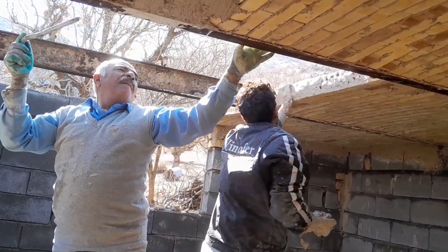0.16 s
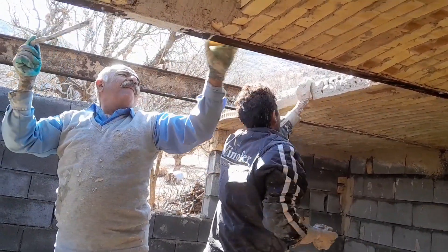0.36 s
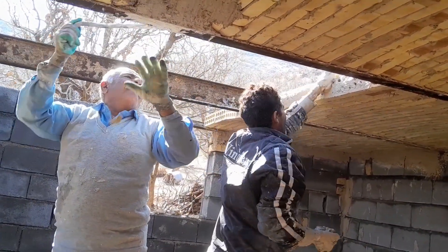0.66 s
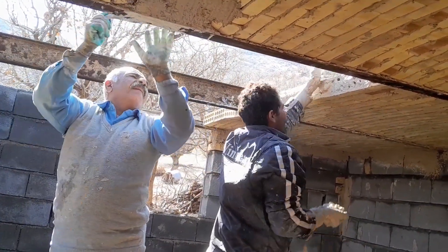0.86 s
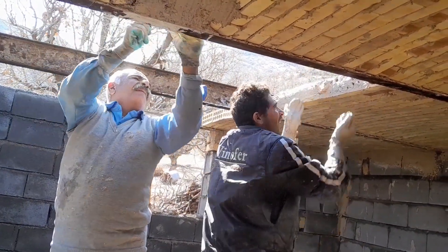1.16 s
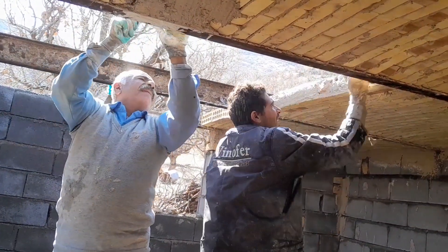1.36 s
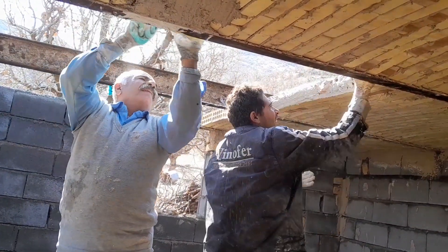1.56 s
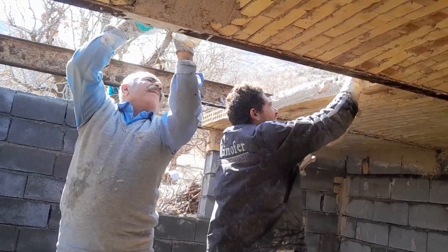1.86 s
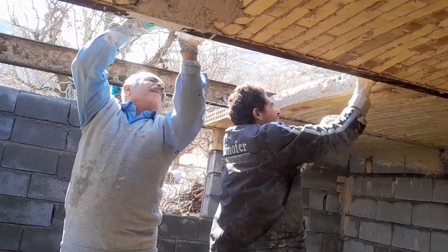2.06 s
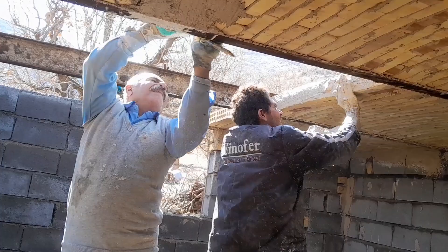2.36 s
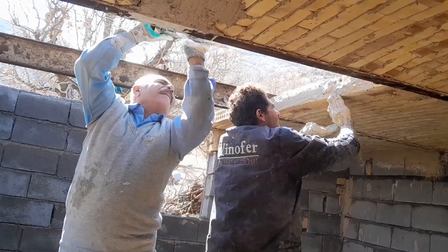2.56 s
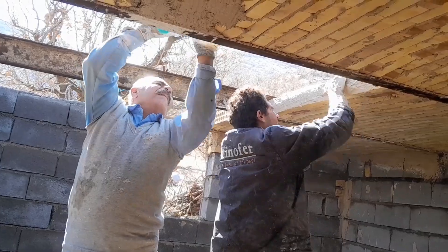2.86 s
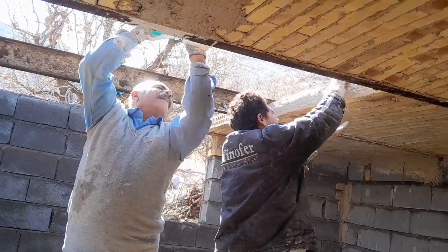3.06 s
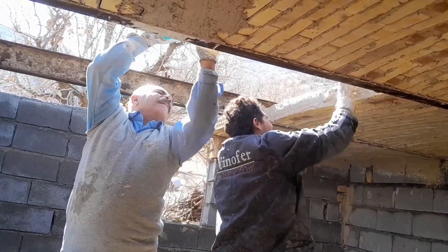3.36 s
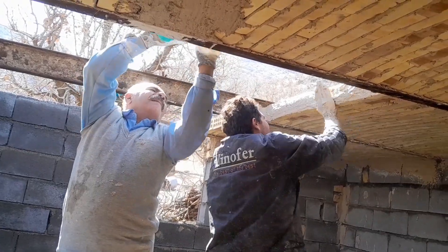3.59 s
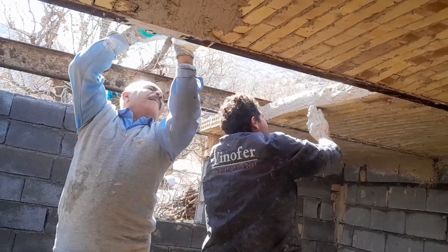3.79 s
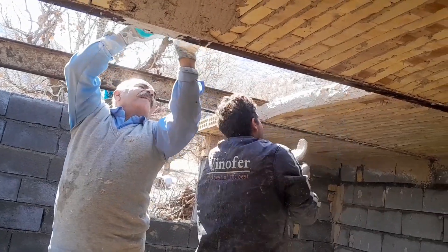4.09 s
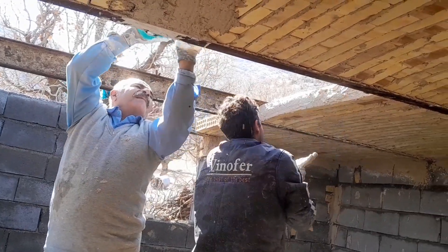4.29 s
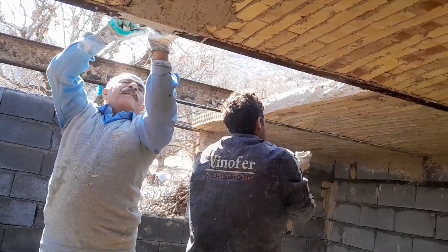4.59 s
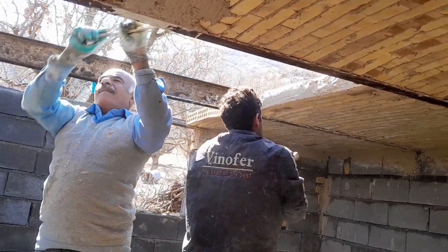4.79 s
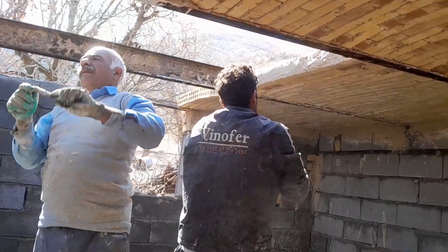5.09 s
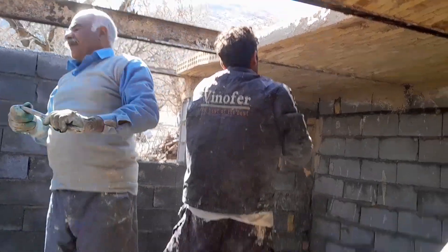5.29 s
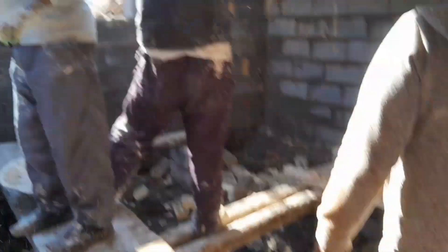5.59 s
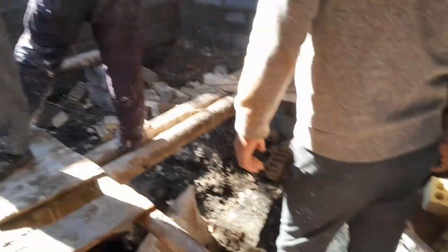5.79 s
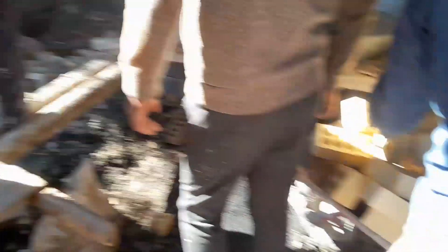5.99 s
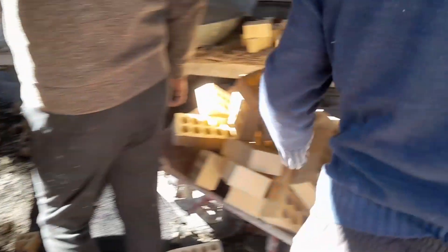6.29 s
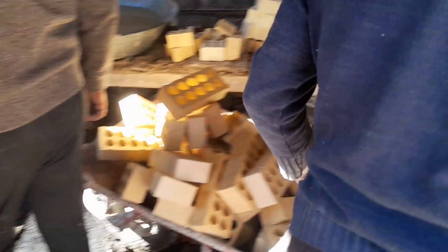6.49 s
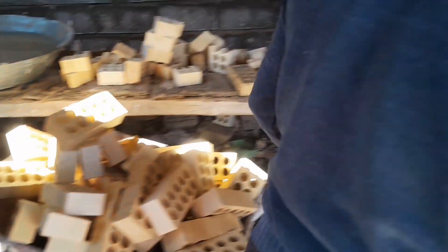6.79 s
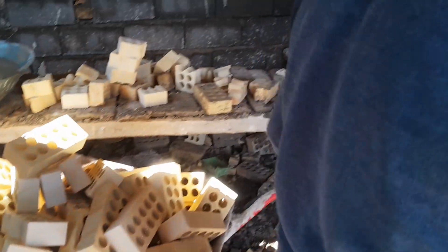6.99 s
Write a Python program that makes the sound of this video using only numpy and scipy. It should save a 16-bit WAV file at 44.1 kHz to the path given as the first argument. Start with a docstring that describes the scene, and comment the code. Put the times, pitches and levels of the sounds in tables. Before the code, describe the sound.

Masonry work heard near at hand: faint sleeve rustle and a small bright brick clink, two brief high blade rings, then a run of firm knocks on brick, strongest in the middle. A faint squeak falls between two taps. Dry, juddering stick-slip scrapes fill the later gaps and end with a fluttering metallic whine. Quiet gritty touches follow against a low, slowing engine hum. Partly enclosed shed, handheld stereo microphone, dull open-air background.

```python
"""Faint outdoor murmur and a distant engine lie under masons at a shallow brick vault in a half-open block shed.
Clothes rustle, bricks clink and grit drops: filtered noise, decaying modes and stick-slip grains.
One then taps bricks home with a trowel, so that modes of the vault boom and the blade rings, and scrapes
mortar off the joint in short stick-slip strokes. A faint squeak falls between two taps.
Late on the dragged blade sings as fluttering resonances, and the engine's note slows and swells."""
import sys
import numpy as np
from scipy import signal
from scipy.fft import rfft, irfft
from scipy.io import wavfile

SR = 44100
rng = np.random.default_rng(int(sys.argv[2]) if len(sys.argv) > 2 else 0)


def waveform_to_disk(signal):
    """Save audio, clipped to [-1, 1], as 16-bit WAV at the path in sys.argv[1]."""
    frames = np.transpose(np.atleast_2d(signal))
    scaled = np.clip(frames, -1, 1) * 32767
    samples = np.round(scaled).astype(np.int16)
    wavfile.write(sys.argv[1], SR, samples)


N = 315270

CUTOFF_HZ = 16000
SIZE = 2 ** 15   # samples in one event
AGE = np.arange(SIZE) / SR   # s since the event began
TIME = np.arange(N) / SR
EDGES_HZ = 33 * 2 ** (np.arange(19) / 2)   # half-octave bands
CENTRES_HZ = np.sqrt(EDGES_HZ[1:] * EDGES_HZ[:-1])

# Taps on the vault. Each row: start in seconds, level in dB before trim, hardness in dB,
# pitch of the struck brick in Hz, sway of the whole span in dB.
TAPS = [(1.128, -30, 15, 498, -62), (1.577, -21, 3, 681, -38), (1.965, -29, -6.5, 633, -35.5),
        (2.338, -23.5, 9, 1074, -56), (2.859, -20, -8.5, 994, -50), (3.239, -21.5, -1, 996, -26),
        (3.611, -18.5, 4, 929, -25.5), (3.971, -17, 3, 955, -37.5), (4.335, -17.5, -12.5, 1052, -32.5),
        (4.68, -25.8, -11, 1106, -33), (5.202, -24, 1.5, 764, -58)]
# Trowel strokes along the joint. Each row: start in seconds, length in seconds, level in dB before trim,
# hardness in dB, name of the brick jolted.
STROKES = [(1.116, 0.0038, -35.5, 11, "top"), (1.172, 0.037, -28.5, -0.5, "middle"),
           (1.227, 0.0058, -32.5, -2.5, "low"), (3.865, 0.016, -30, -7, "low"),
           (3.887, 0.053, -34, 12, "deep"), (3.963, 0.0052, -18.5, 13, "high"),
           (3.976, 0.08, -25.5, 5.5, "top"), (4.091, 0.0047, -20, 2, "high"),
           (4.113, 0.025, -11, 4.5, "middle"), (4.189, 0.0053, -24.5, -1, "high"),
           (4.248, 0.043, -21.5, -3, "low"), (4.459, 0.012, -26.5, -6, "low"),
           (4.517, 0.036, -35.5, -5.5, "deep"), (4.73, 0.048, -34.5, 4, "high"),
           (4.799, 0.096, -27.5, 2, "deep"), (4.865, 0.025, -22.5, 7.5, "high"),
           (5.012, 0.043, -45.5, -7, "deep"), (5.081, 0.015, -35, -8.5, "high"),
           (5.118, 0.019, -22, 0.5, "deep"), (5.197, 0.012, -21, -4, "deep"),
           (5.44, 0.068, -32, -4.5, "deep"), (5.587, .027, -22.9, 0, "deep"),
           (5.65, 0.021, -30.5, -0.5, "deep"), (5.701, 0.018, -38, -7, "high")]
# Bricks picked up, shifted and set down. Each row: start in seconds, length in seconds,
# level in dB before trim, hardness in dB.
TOUCHES = [(0.098, 0.036, -55.5, -15), (0.234, .032, -50.5, 0.5), (0.344, 0.005, -34, -0.5),
           (.956, .005, -68, 24.5), (1.029, 0.13, -62, -8), (1.265, 0.027, -53, 17.5),
           (1.319, 0.0088, -46.5, -2), (1.425, 0.0042, -44.5, 20.5), (1.883, 0.059, -49.5, -9.5),
           (2.043, 0.0036, -53, 7.5), (2.291, 0.0046, -41, -14.5), (2.634, .01, -53, -14),
           (3.375, 0.12, -55.5, -1.5), (5.176, 0.0098, -46.5, 18.5), (6.546, 0.044, -55.5, -13),
           (6.6, 0.0027, -42.5, -4), (6.633, 0.019, -55.5, -36), (6.723, 0.013, -47, 5.5),
           (6.978, 0.061, -54.5, 0)]
# The whole span sways. Each row: frequency in Hz, level in dB, t60 in seconds.
SWAY_MODE = [(59.6, 4.5, 0.52)]
# Outdoor murmur. Each row: time in seconds, level in dB.
MURMUR_LEVEL = [(0, -64), (.5, -62), (.8, -71), (1.8, -52), (2.7, -53.5), (3.6, -45.5), (5.85, -59),
                (6.5, -54), (7.15, -58.5)]


def from_db(db):
    """Decibels to gain."""
    return 10 ** (np.asarray(db) / 20)


def rms(x):
    """Root mean square."""
    return np.sqrt(np.mean(x ** 2) + 1e-20)


def at_hz(points, hz):
    """Read a table along log frequency."""
    known_hz, values = np.transpose(points)
    return np.interp(np.log(np.maximum(hz, 1)), np.log(known_hz), values)


def at_time(rows, t):
    """Read every column of a curve."""
    s, *columns = np.transpose(rows)
    return [np.interp(t, s, c) for c in columns]


def band(x, low_hz, high_hz):
    """Causal band-pass."""
    return signal.sosfilt(signal.butter(2, [low_hz, high_hz], "band", fs=SR, output="sos"), x + 1e-18)


def low_pass(x, order, hz):
    """Causal low-pass."""
    return signal.sosfilt(signal.butter(order, hz, fs=SR, output="sos"), x)


def dying(t60_s):
    """A decay that loses 60 dB in t60."""
    return np.exp(-np.log(1000) * AGE / t60_s)


def coloured(x, spectrum):
    """Minimum-phase colouring: nothing sounds before its cause."""
    gain_db = at_hz(spectrum, np.arange(SIZE // 2 + 1) * SR / SIZE)
    cepstrum = irfft(np.log(from_db(gain_db)))
    # fold onto positive time
    cepstrum[1:SIZE // 2] *= 2
    cepstrum[SIZE // 2 + 1:] = 0
    return irfft(rfft(x, SIZE) * np.exp(rfft(cepstrum)))


def noise_bank(size):
    """Half-octave bands of stereo noise, alike in the bass and unrelated in the treble."""
    # Left-right likeness. Each row: frequency in Hz, likeness 0-1.
    likeness = [(60, 1), (250, 0.72), (500, 0.78), (1000, 0), (2000, 0), (8000, 0)]
    white, bank = rng.standard_normal((2, 2, size)), []
    for k, hz in enumerate(CENTRES_HZ):
        mid, side = band(white[k % 2], EDGES_HZ[k], EDGES_HZ[k + 1])
        alike = np.clip(at_hz(likeness, hz), 0, 1)
        bank.append(np.sqrt((1 + alike) / 2) * mid + np.sqrt((1 - alike) / 2) * side * [[1], [-1]])
    return np.array(bank)


def air():
    """Dull outdoor murmur, heard only below a steep edge near 2 kHz, and the thin hiss of sleeves and dust."""
    # Spectra. Each row: frequency in Hz, relative density in dB per Hz.
    murmur_colour = [(30, -21.5), (60, 10.5), (110, 5), (200, 5), (500, -2.5), (1200, -0.5), (2100, -8.5),
                     (3000, -11), (16000, -49.5)]
    hiss_colour = [(30, -39), (1500, -35.5), (3000, 3), (5000, -3.5), (8000, -3.5), (9500, -9.5),
                   (13000, -3), (16000, -12)]
    bank = noise_bank(size=N)
    murmur = np.tensordot(from_db(at_hz(murmur_colour, CENTRES_HZ)), bank, 1)
    hiss = np.tensordot(from_db(at_hz(hiss_colour, CENTRES_HZ)), bank, 1)
    murmur = low_pass(murmur, order=8, hz=2160)
    murmur_gain = from_db(at_time(MURMUR_LEVEL, TIME)[0])
    return murmur_gain * murmur / rms(murmur) + rustle_level() * hiss / rms(hiss)


def rustle_level():
    """Rustle rises just before each contact and lingers after it; firm or crowded contacts stir up more."""
    floor_db, rustle_db = -79, -57.5   # rustle for a contact of 0 dB
    db_per_contact_db = 0.26
    lead_s, linger_s = 0.1, 0.12
    contacts = [(s, db) for s, db, *_ in TAPS] + [(s, db) for s, _, db, *_ in STROKES + TOUCHES]
    t = TIME[::100]
    power = from_db(floor_db) ** 2
    for s, db in contacts:
        envelope = np.exp(-np.maximum((s - t) / lead_s, (t - s) / linger_s))
        power = power + (from_db(rustle_db + db_per_contact_db * db) * envelope) ** 2
    return np.interp(TIME, t, np.sqrt(power))


def engine(half_order_db, third_half_db, waver):
    """A far exhaust note slows and swells; uneven firing adds lines at half and one and a half its pitch."""
    fast_hz, idle_hz, slows_s, settle_s = 134.8, 113, 5.4, 0.22
    under_murmur_db = -12.5
    # Swells of the note. Each row: time of the top in seconds, half-width in seconds, level in dB.
    swells = [(5.5, 0.22, -45.5), (6.02, .12, -44.5), (6.36, 0.051, -46), (6.6, 0.12, -46)]
    hz = idle_hz + (fast_hz - idle_hz) * np.exp(-np.maximum(TIME - slows_s, 0) / settle_s)
    level = from_db(at_time(MURMUR_LEVEL, TIME)[0] + under_murmur_db)
    for s, width_s, db in swells:
        level = level + from_db(db) * np.exp(-((TIME - s) / width_s) ** 2)
    phase = 2 * np.pi * np.cumsum(hz) / SR
    note = np.sin(phase)
    note += from_db(half_order_db) * np.sin(phase / 2)
    note += from_db(third_half_db) * np.sin(3 * phase / 2)
    unsteady = signal.resample(rng.standard_normal(N // 2000), N)
    return np.sqrt(2) * level * note * (1 + waver * unsteady)


def shed(late_db, late_t60_s):
    """Returns a source of diffuse responses of unit energy: a quick decay and a faint long one."""
    # Quick decay. Each row: frequency in Hz, t60 in seconds.
    quick_t60 = [(60, 0.8), (150, 0.36), (450, 0.2), (1400, 0.21), (4000, 0.18), (14000, 0.17)]
    bank = noise_bank(size=4 * SIZE)
    late = from_db(late_db) * dying(late_t60_s)
    decays = np.array([dying(at_hz(quick_t60, hz)) + late for hz in CENTRES_HZ])
    decays *= 1 - np.exp(-AGE / 0.00045)   # build-up, s

    def response():
        """A fresh stretch of the noise under the decays."""
        start = rng.integers(SIZE // 2, 2 * SIZE)
        tail = np.einsum("bct,bt->ct", bank[:, :, start:start + SIZE], decays)
        return tail / (rms(tail) * np.sqrt(SIZE))
    return response


def placed(x, s):
    """A direct sound reaches the two ports with a level and a time difference."""
    # Where the work lies as the microphone turns. Each row: time in seconds,
    # left-right level in dB, left lag in ms.
    bearing = [(0, -3, -0.2), (1.2, 6.5, -0.064), (1.7, 2.5, -0.073), (3.3, 4, 0.042), (4.0, 2.5, 0.21),
               (7, -0.5, 0.39)]
    pan_db, lag_ms = at_time(bearing, s)
    late_samples = np.maximum([lag_ms, -lag_ms], 0) * SR / 1000
    ports = np.array([np.roll(x, int(round(n))) for n in late_samples])
    return ports * from_db([[pan_db / 2], [-pan_db / 2]])


def add(out, s, sound):
    """Mix a sound in at its time."""
    i = int(s * SR)
    out[:, i:i + SIZE] += sound[:, :N - i]


def slips(length_s, per_s, spread_db, grip):
    """Stick and slip: a first catch, then grains of uneven size that break away as the stroke lasts."""
    sizes = from_db(spread_db * np.minimum(rng.exponential(1, SIZE), 3)) * rng.choice([-1, 1], SIZE)
    train = sizes * (rng.random(SIZE) < per_s / SR) * np.exp(-(AGE / length_s) ** 4)
    train[0] = grip
    return train


def through(force, response):
    """A force played through a response."""
    return signal.fftconvolve(force[None], response, axes=1)[:, :SIZE]


def zone_levels(tone, db, hardness_db):
    """Zone levels of a contact: its level, the tone's offsets and the tone's shares of hardness."""
    offsets_db, shares = np.transpose(tone)
    return db + offsets_db + shares * hardness_db


def voiced(sound, levels_db, span_s):
    """Weight and hardness of a contact: its thud, knock, clack and crack over the first moments."""
    # Edges of the four zones in Hz.
    edges_hz = [100, 350, 1400, 4000, 8000]
    zones = list(zip(edges_hz, edges_hz[1:]))
    centres_hz = np.sqrt(np.prod(zones, axis=1))
    for _ in range(2):   # zones overlap: the second pass refines
        start = sound[:, :int(span_s * SR)]
        now_db = [20 * np.log10(rms(band(start, *zone))) for zone in zones]
        sound = coloured(sound, list(zip(centres_hz, np.subtract(levels_db, now_db))))
    return sound


def handling(room, direct_db, level_db):
    """Small gritty touches with no ring of their own: stick-slip grains through the shed."""
    # Spectrum. Each row: frequency in Hz, gain in dB.
    grit_colour = [(30, -10.5), (150, 1), (500, 13.5), (1700, 4.5), (3000, -10), (7500, -10.5),
                   (9300, -17.5), (13000, -15), (16000, -28)]
    # Thud, knock, clack, crack. Each row: dB over the level, dB gained per dB of hardness.
    tone = [(-10.5, -0.37), (1.5, -0.12), (1.4, 0.28), (-11, 0.76)]
    out = np.zeros((2, N))
    for s, length_s, db, hardness_db in TOUCHES:
        direct = from_db(direct_db) * placed(signal.unit_impulse(SIZE), s)
        force = slips(length_s, per_s=900, spread_db=5.5, grip=2.4)
        sound = through(force, coloured(direct + room(), grit_colour))
        sound = voiced(sound, zone_levels(tone, db, hardness_db), span_s=length_s + 0.0022)
        add(out, s, from_db(level_db) * sound)
    return out


def ringing(modes, swell_cycles):
    """Decaying modes that build up over a few cycles, with new strengths at each contact."""
    scatter_db, total = 1.5, 0
    for k, (hz, db, t60_s) in enumerate(modes):
        size = from_db(db + scatter_db * rng.normal()) * (-1) ** k
        swell = 1 - np.exp(-AGE * hz / swell_cycles)
        total = total + size * np.sin(2 * np.pi * hz * AGE) * dying(t60_s) * swell
    return total


def clinks(room, hits, modes, wet_db, pan_db, ring_share):
    """A small hard object rings in the shed; a hand that holds it shortens the ring."""
    out = np.zeros((2, N))
    for s, db in hits:
        ring = ringing(np.array(modes) * [1, 1, ring_share], swell_cycles=1)
        wash = through(ring, room())
        sound = ring + from_db(wet_db) * wash * rms(ring) / rms(wash)
        add(out, s, from_db(db) * sound * from_db([[pan_db / 2], [-pan_db / 2]]))
    return out


def contact(soft_hz, crumble_db, crumble_t60_s):
    """A blunt push with a brief crackle of crushed grit."""
    push = low_pass(signal.unit_impulse(SIZE) + 1e-18, order=2, hz=soft_hz)
    grit = band(rng.standard_normal(SIZE) * dying(crumble_t60_s), soft_hz, CUTOFF_HZ)
    return push + from_db(crumble_db) * grit / (rms(grit) * np.sqrt(SIZE))


def brickwork(count, low_hz, high_hz, t60_s):
    """Each contact wakes a different set of the bricks' many short, high modes; unit energy."""
    draws, age = rng.random((count, 4)), AGE[:SIZE // 3]
    hz = low_hz * (high_hz / low_hz) ** ((np.arange(count) + draws[:, 0]) / count)
    sizes = np.sqrt(hz) * (.25 + draws[:, 1] ** 2)
    cycles = hz[:, None] * age
    rings = np.array([sizes @ np.sin(2 * np.pi * (cycles + draws[:, [port]])) for port in (2, 3)])
    rings = np.pad(rings, ((0, 0), (0, SIZE - len(age)))) * dying(t60_s)
    return rings / (rms(rings) * np.sqrt(SIZE))


def scraping(room, direct_db, joint_db, steel_db, bricks_db, jolt_db, jolt_t60_s, bite_s, level_db):
    """The blade bites and jolts one brick, then judders over mortar, ringing and shaking the joint."""
    # Modes of the joint, and of the blade pressed on mortar. Each row: frequency in Hz, level in dB,
    # t60 in seconds.
    joint_modes = [(214.9, -1, 0.31), (250, 5, 0.09), (306, -30.5, .1), (378, -16, 0.28), (454, 0, 0.04),
                   (520, -1, 0.11), (676, 0, 0.17), (872, -4, 0.086)]
    pressed_modes = [(2270, -4, 0.22), (2420, 3.5, 0.088), (2610, -13, 0.047), (3870, -8, 0.12),
                     (4080, -11, 0.092), (4770, -20.5, 0.16), (5620, -11.5, 0.22), (6930, -11.5, 0.25),
                     (8250, -30, 0.084), (9600, -16.5, .12)]
    # Spectrum. Each row: frequency in Hz, gain in dB.
    stroke_colour = [(30, -50.5), (100, -4), (230, 9.5), (480, 10.5), (900, -3), (1500, -15.5), (2600, -21),
                     (3200, -30), (5500, -24.5), (8200, -27), (9100, -44.5), (10500, -28.5), (16000, -35.5)]
    # Thud, knock, clack, crack. Each row: dB over the level, dB gained per dB of hardness.
    tone = [(0, -0.88), (0, -0.25), (-11.5, 0.46), (-23.5, 0.36)]
    # Loose bricks a stroke can jolt: name to pitch in Hz.
    loose_hz = {"deep": 225.7, "low": 246.8, "middle": 300, "high": 384.2, "top": 480}
    sway_under_stroke_db = -21.5
    out = np.zeros((2, N))
    for s, length_s, db, hardness_db, brick in STROKES:
        hit = contact(soft_hz=1480, crumble_db=-13, crumble_t60_s=0.0033)
        direct = from_db(direct_db) * placed(hit, s)
        bricks = from_db(bricks_db) * brickwork(count=36, low_hz=693.6, high_hz=12930, t60_s=0.095)
        pressed = np.array(pressed_modes) * [1 + 0.02 * rng.normal(), 1, 1]   # pressure retunes the blade
        body = from_db(joint_db) * ringing(joint_modes, swell_cycles=0.61)
        body = body + from_db(steel_db) * ringing(pressed, swell_cycles=0.93)
        force = slips(length_s, per_s=500, spread_db=4.0, grip=4.6)
        sound = through(force, coloured(direct + room() + bricks, stroke_colour) + placed(body, s))
        jolt = placed(ringing([(loose_hz[brick], 0, jolt_t60_s)], swell_cycles=3.8), s)
        sound = sound / rms(sound) + from_db(jolt_db) * jolt / rms(jolt)
        sound = sound * (1 - np.exp(-AGE / bite_s))
        sound = voiced(sound, zone_levels(tone, db, hardness_db), span_s=length_s + 0.022)
        add(out, s, from_db(level_db) * sound)
        sway = placed(ringing(SWAY_MODE, swell_cycles=6.6), s)
        add(out, s, from_db(db + sway_under_stroke_db) * sway)
    return out


def taps(room, echo_s, echo_db, echo_hz, modes_db, bricks_db, struck_db, level_db):
    """A sharp contact, its dull echo off the wall, the struck brick, the booming vault and the shed."""
    # Vault modes. Each row: frequency in Hz, level in dB, t60 in seconds.
    vault_modes = [(130.9, -6, 0.42), (174.5, 4, 0.2), (223, -14, 0.53), (315, -13.5, 0.18),
                   (392, -19.5, 0.24), (485.6, 6, 0.16), (710, -5, 0.17), (938, 2.5, 0.08),
                   (1056, -17, 0.17), (1102, -5.5, 0.18), (1296, -5, .13), (1845, -17.5, 0.11),
                   (2073, -20, 0.43), (2560, -29.5, 0.19), (6940, -31.5, 0.26), (9100, -25, 0.094)]
    # Struck brick. Each row: multiple of its pitch, level in dB, t60 in seconds.
    struck_modes = [(1, 4, 0.12), (1.26, -9, 0.11), (2.1, -15.5, 0.09)]
    # Spectrum. Each row: frequency in Hz, gain in dB.
    tap_colour = [(30, -47), (60, -21), (130, -17.5), (400, 1.5), (950, -7), (1500, -15), (2300, -18.5),
                  (3100, -20), (5000, -20), (8200, -25.5), (9200, -33), (11000, -32), (16000, -41.5)]
    # Thud, knock, clack, crack. Each row: dB over the level, dB gained per dB of hardness.
    tone = [(-0.9, 0), (-0.5, 0), (-9.5, 0.56), (-22.5, 1)]
    direct_db = -1
    out = np.zeros((2, N))
    echo = low_pass(signal.unit_impulse(SIZE, int(echo_s * SR)) + 1e-18, order=2, hz=echo_hz)
    for s, db, hardness_db, brick_hz, sway_db in TAPS:
        hit = contact(soft_hz=1790, crumble_db=-21.0, crumble_t60_s=0.0097)
        direct = -from_db(direct_db) * placed(hit + from_db(echo_db) * echo, s)
        boom = from_db(modes_db) * placed(ringing(vault_modes, swell_cycles=2.7), s)
        bricks = from_db(bricks_db) * brickwork(count=34, low_hz=913.4, high_hz=14000, t60_s=0.066)
        sound = coloured(direct + room() + bricks, tap_colour) + boom
        struck = placed(ringing(np.array(struck_modes) * [brick_hz, 1, 1], swell_cycles=0.51), s)
        sound = sound + from_db(struck_db) * struck * rms(sound) / rms(struck)
        sound = voiced(sound, zone_levels(tone, db, hardness_db), span_s=0.062)
        add(out, s, from_db(level_db) * sound)
        add(out, s, from_db(sway_db) * placed(ringing(SWAY_MODE, swell_cycles=3.3), s))
    return out


def singing(drags, modes, flutter, side_share):
    """Friction keeps resonances sounding through each drag; they flutter, and sag as the pressure eases."""
    attack_s, release_s = 0.0083, 0.017
    sag_per_s = 0.173   # share of the pitch
    out = np.zeros((2, N))
    for s, length_s, db, pitch in drags:
        envelope = np.minimum(AGE / attack_s, 1) * np.exp(-np.maximum(AGE - length_s, 0) / release_s)
        bend = pitch * (1 - sag_per_s * np.minimum(AGE, length_s))
        held, tone = int(length_s * SR), 0
        for hz, width_hz, mode_db in modes:
            unsteady = low_pass(rng.standard_normal((2, SIZE)), order=1, hz=width_hz / 2)
            grip = 1 + flutter * unsteady / rms(unsteady)
            phase = 2 * np.pi * (hz * np.cumsum(bend) / SR + rng.random((2, 1)))
            tone = tone + from_db(mode_db) * grip / rms(grip[:, :held]) * np.sin(phase)
        mid, side = [part / rms(part[:held]) for part in tone]
        add(out, s, from_db(db) * envelope * (mid + side_share * side * [[1], [-1]]))
    return out


def scene():
    """All the work in one shed, over the outdoor background."""
    # Rings of a loose brick and of the steel blade. Each row: start in seconds, level in dB.
    brick_hits = [(.345, -37.5), (.360, -28), (1.322, -48.5), (1.886, -50), (1.966, -41)]
    blade_hits = [(1.128, -29), (1.425, -27.5)]
    # Their modes. Each row: frequency in Hz, level in dB, t60 in seconds before ring_share.
    brick_modes = [(2239, 0, .15), (2290, -6, .11), (2600, -11, .08), (3440, -13, .14), (4436, -24, .11),
                   (5071, -22, .12), (7440, -19, .09), (7935, -18, .11)]
    blade_modes = [(2160, -13, 0.14), (4910, -7, 0.034), (8480, -8, 0.15), (8625, -7, 0.2),
                   (12900, -4, 0.14), (12910, -37, 0.064), (14250, -2.5, 0.093), (14200, -21.5, 0.13),
                   (15560, -20, 0.093)]
    # A faint squeak, and drags that make the blade sing. Each row: start in seconds, length in seconds,
    # level in dB of mid alone, pitch ratio at the start.
    squeaks = [(3.38, 0.13, -50, 1.015)]
    drags = [(5.35, 0.061, -52.5, 1.06), (5.445, 0.119, -41.5, 1.018), (5.59, 0.11, -56, 1.028)]
    # Their resonances. Each row: frequency in Hz before the pitch ratio, width in Hz, level in dB.
    squeak_modes = [(1220, 40, 0), (1440, 50, -8), (2000, 50, -10), (2880, 120, -21), (4400, 200, -25)]
    singing_modes = [(2410, 12, 8.5), (2530, 67, -23), (4020, 14, -5), (5500, 12, -5), (7060, 120, -8),
                     (7200, 46, -24), (8430, 82, -17), (10000, 110, -15), (11100, 100, -10.5)]
    background = air() + engine(half_order_db=-11.0, third_half_db=-16.0, waver=0.25)
    room = shed(late_db=-24, late_t60_s=0.72)
    work = handling(room, direct_db=-4.0, level_db=-2.5)
    work += clinks(room, brick_hits, brick_modes, wet_db=-3, pan_db=2.5, ring_share=0.79)
    work += scraping(room, direct_db=-2.5, joint_db=-45, steel_db=-57.0, bricks_db=-3.5,
                     jolt_db=-0.5, jolt_t60_s=0.094, bite_s=0.0018, level_db=-2.0)
    work += taps(room, echo_s=.0103, echo_db=-9.0, echo_hz=1010, modes_db=-50.5, bricks_db=-3.5,
                 struck_db=-9, level_db=-1.0)
    work += clinks(room, blade_hits, blade_modes, wet_db=-3, pan_db=6.5, ring_share=0.45)
    work += singing(squeaks, squeak_modes, flutter=1.4, side_share=0.87)
    work += singing(drags, singing_modes, flutter=1.2, side_share=0.82)
    return background + work


def record(dry):
    """Each port has its own colour; the highest peaks are rounded and the top is cut steeply."""
    # Port colour. Each row: frequency in Hz, left-right difference in dB.
    port_balance = [(60, -2), (140, 0.6), (400, -1), (1300, 0.3), (2600, 3), (5000, -3.5), (9000, 0.7),
                    (14000, -9)]
    impulse = signal.unit_impulse(SIZE)
    ports = [coloured(impulse, np.array(port_balance) * [1, side / 2]) for side in (1, -1)]
    heard = signal.fftconvolve(dry, np.array(ports), axes=1)[:, :N]
    heard = heard / (1 + (heard / .9) ** 6) ** (1 / 6)
    return signal.sosfilt(signal.ellip(10, .1, 80, CUTOFF_HZ, fs=SR, output="sos"), heard)


dry = scene()
out = record(dry)
waveform_to_disk(out)
```